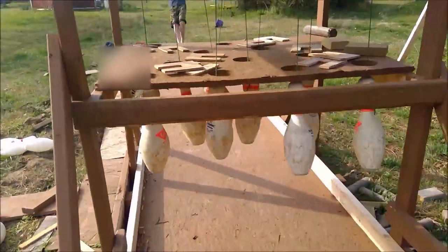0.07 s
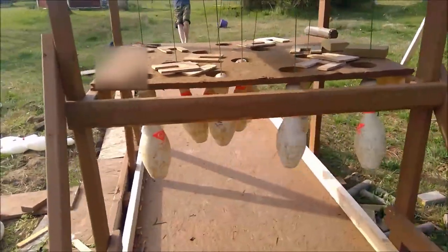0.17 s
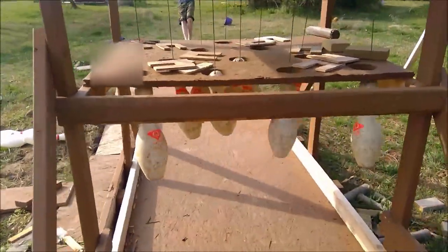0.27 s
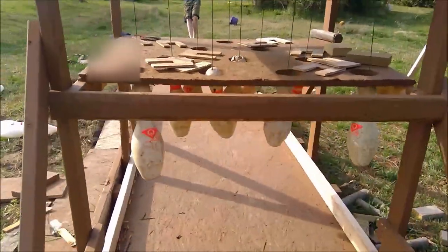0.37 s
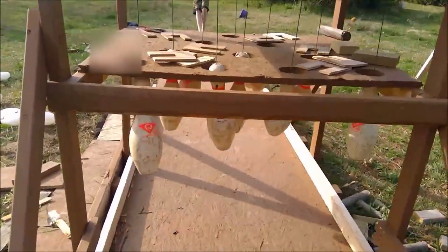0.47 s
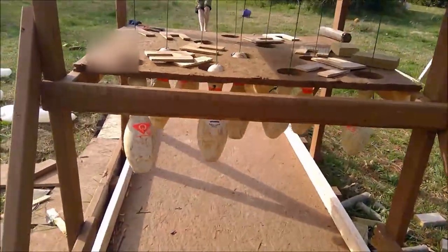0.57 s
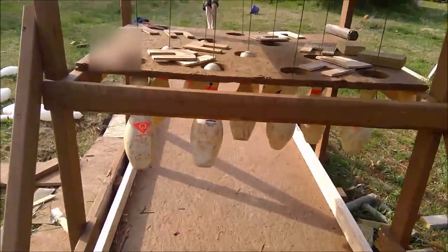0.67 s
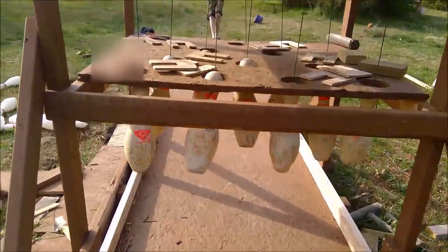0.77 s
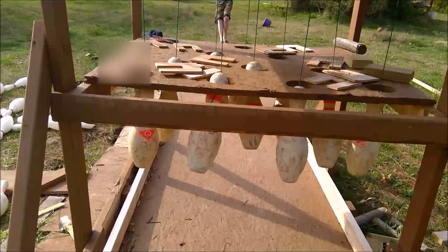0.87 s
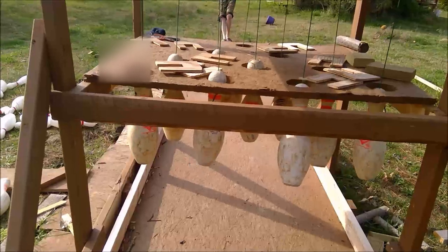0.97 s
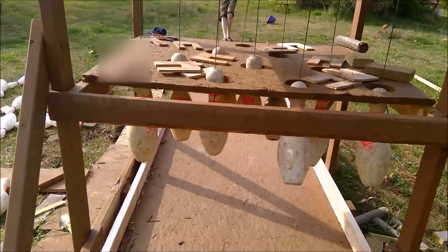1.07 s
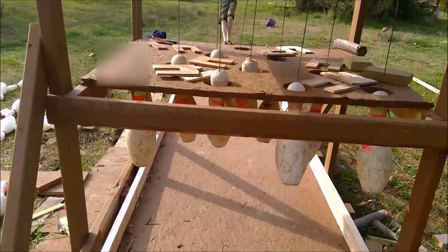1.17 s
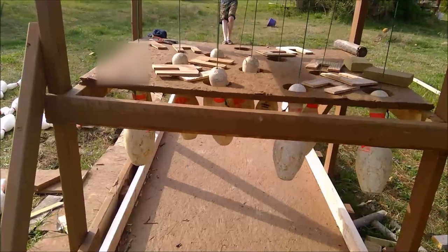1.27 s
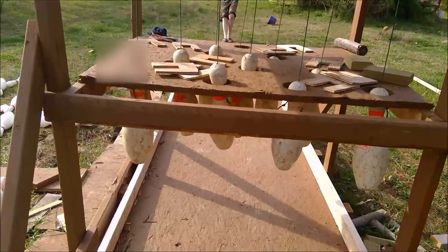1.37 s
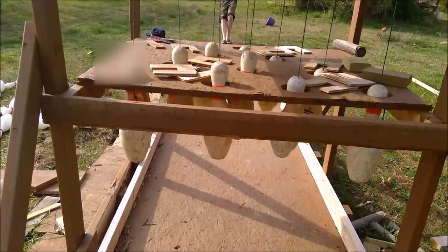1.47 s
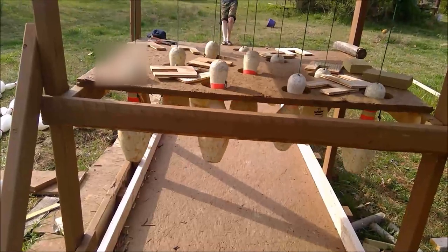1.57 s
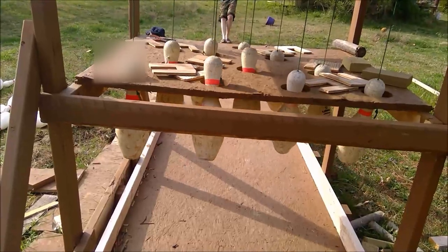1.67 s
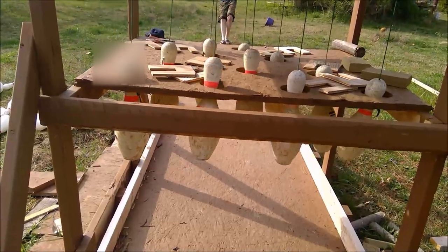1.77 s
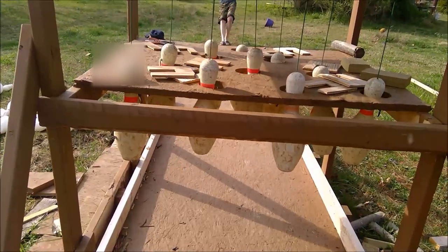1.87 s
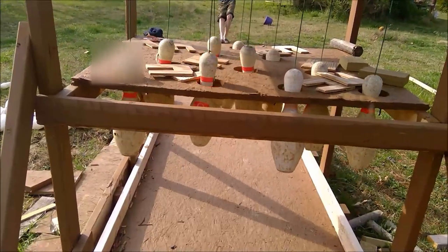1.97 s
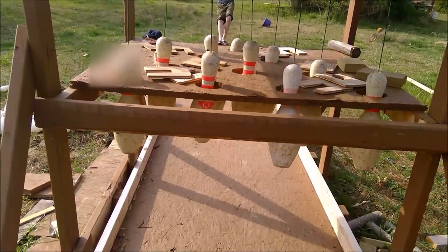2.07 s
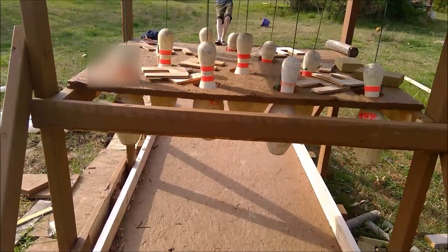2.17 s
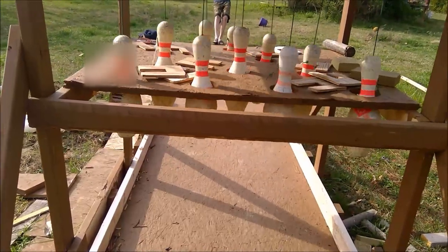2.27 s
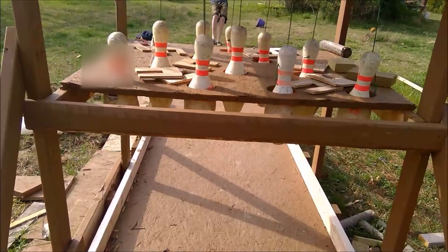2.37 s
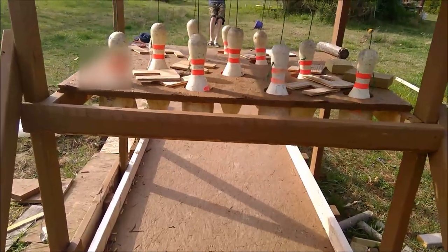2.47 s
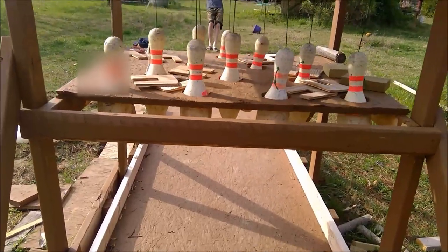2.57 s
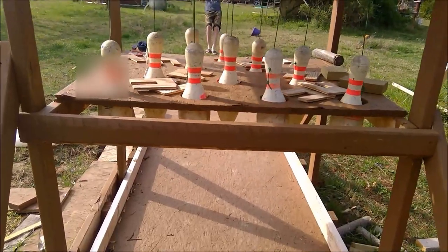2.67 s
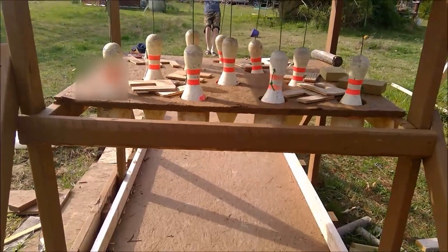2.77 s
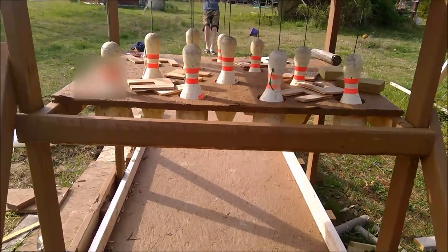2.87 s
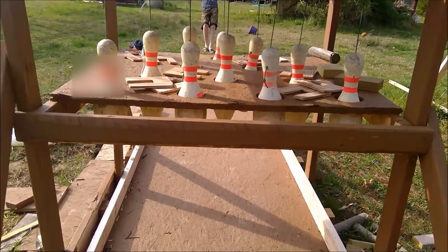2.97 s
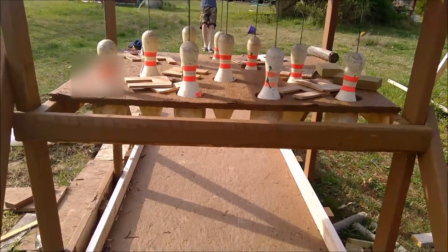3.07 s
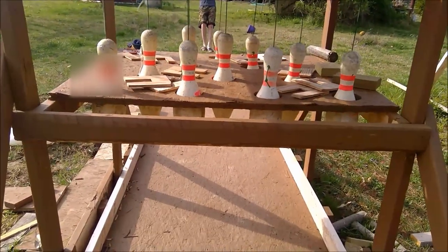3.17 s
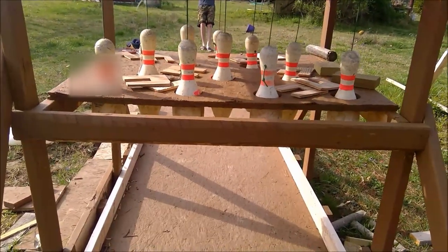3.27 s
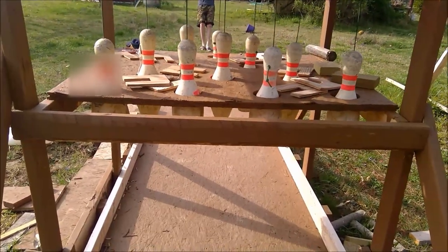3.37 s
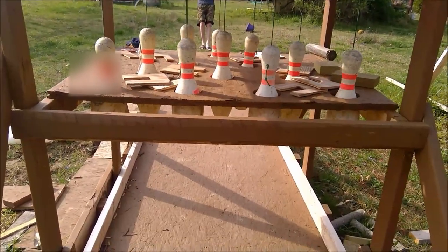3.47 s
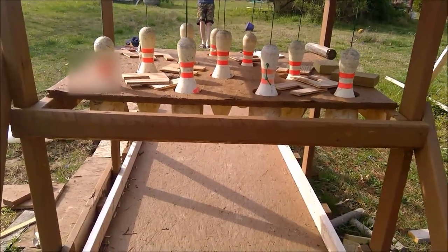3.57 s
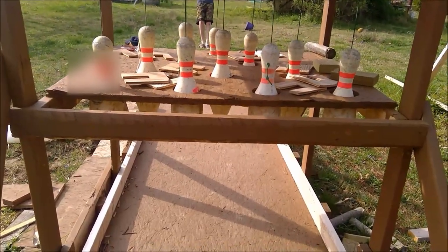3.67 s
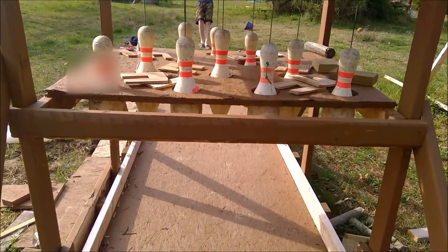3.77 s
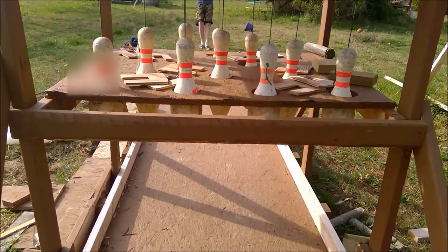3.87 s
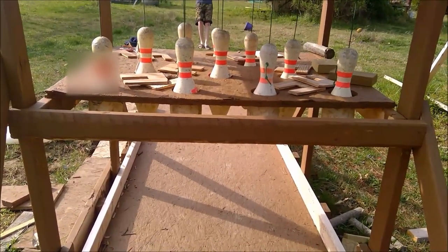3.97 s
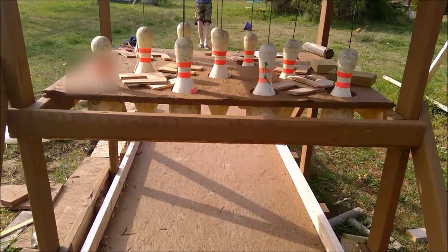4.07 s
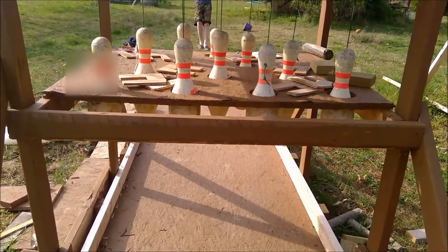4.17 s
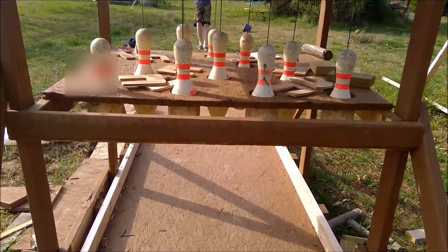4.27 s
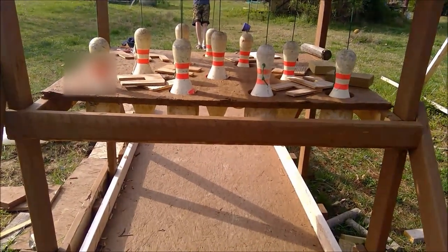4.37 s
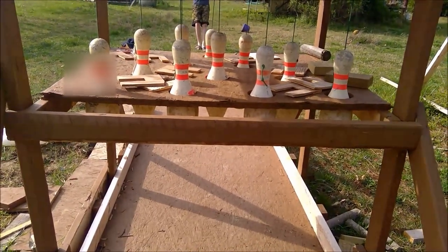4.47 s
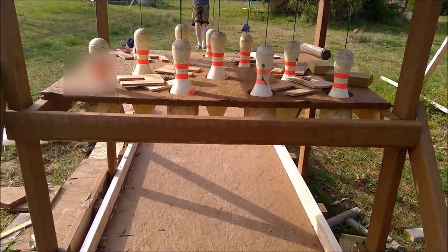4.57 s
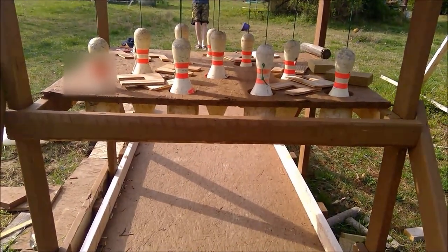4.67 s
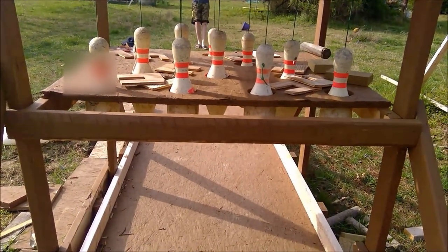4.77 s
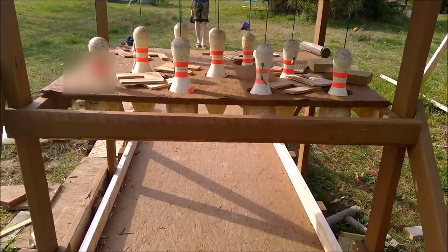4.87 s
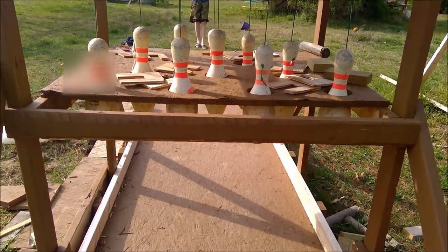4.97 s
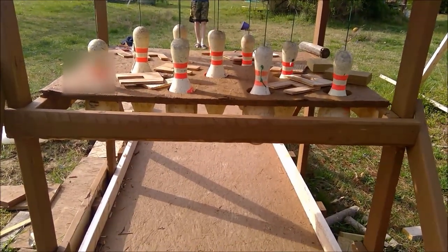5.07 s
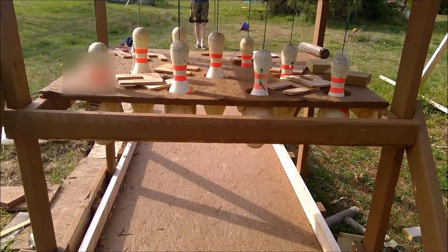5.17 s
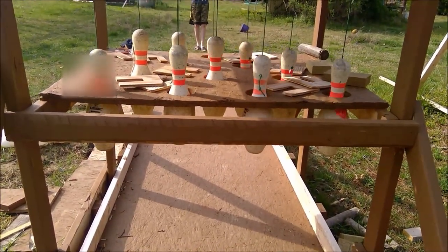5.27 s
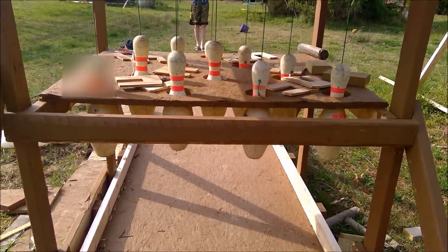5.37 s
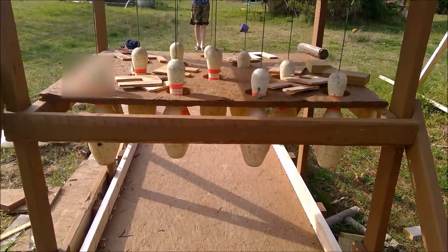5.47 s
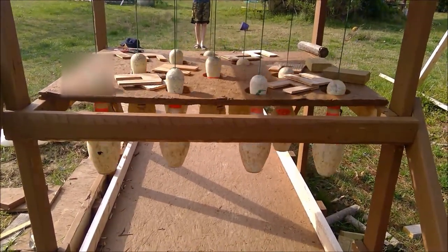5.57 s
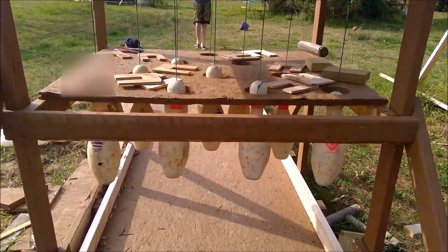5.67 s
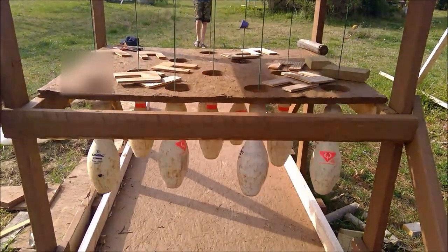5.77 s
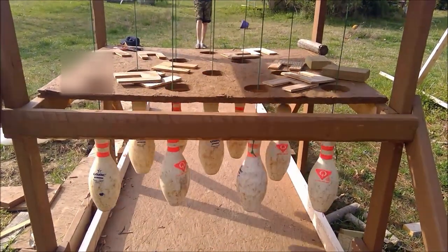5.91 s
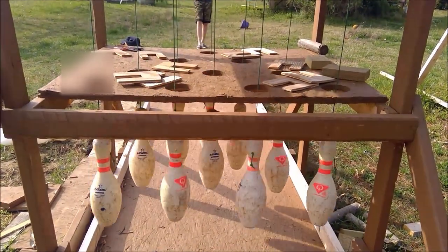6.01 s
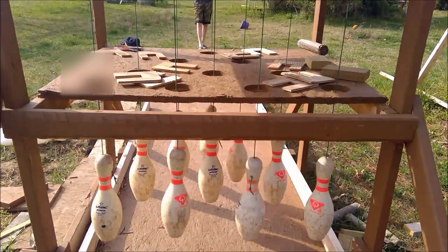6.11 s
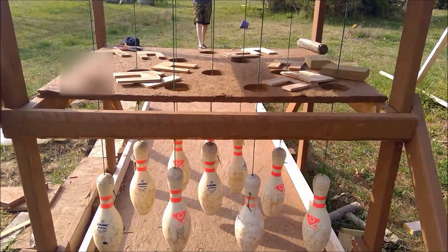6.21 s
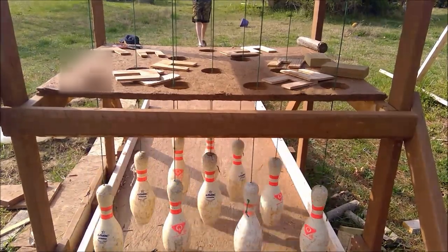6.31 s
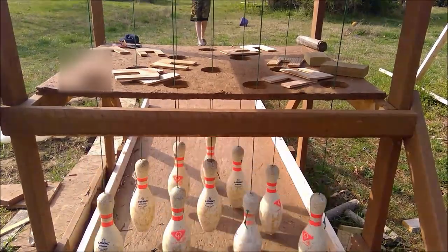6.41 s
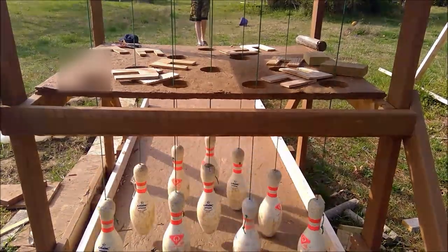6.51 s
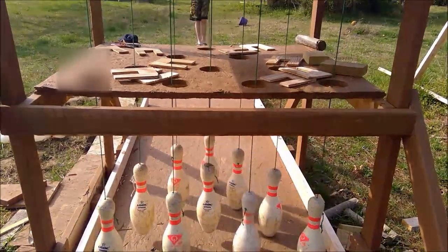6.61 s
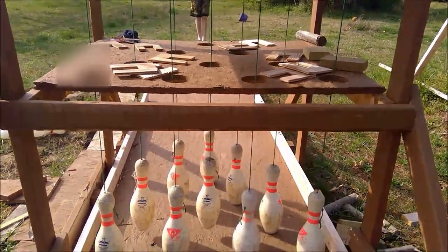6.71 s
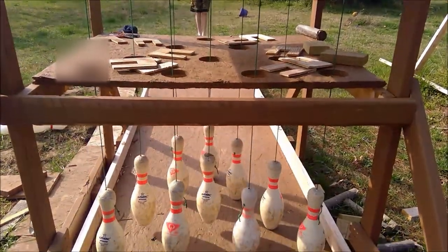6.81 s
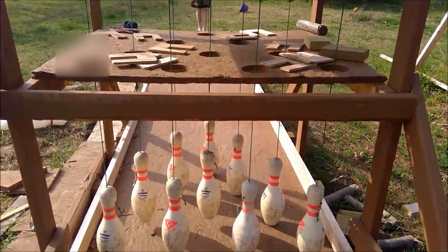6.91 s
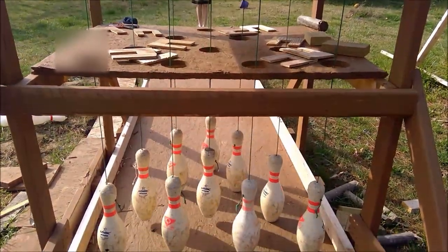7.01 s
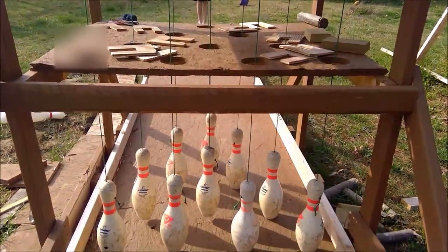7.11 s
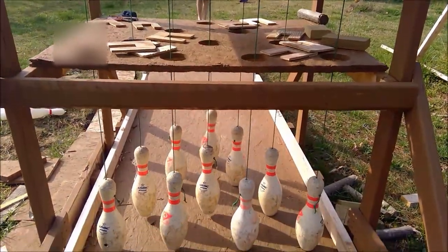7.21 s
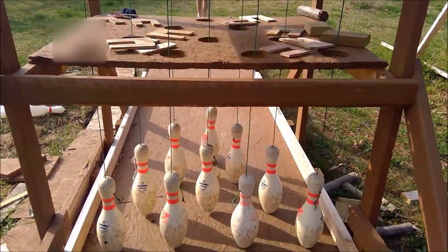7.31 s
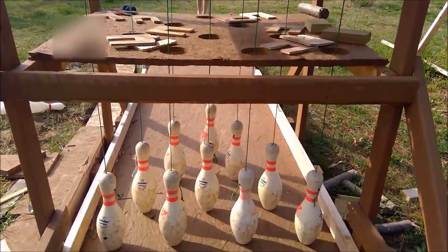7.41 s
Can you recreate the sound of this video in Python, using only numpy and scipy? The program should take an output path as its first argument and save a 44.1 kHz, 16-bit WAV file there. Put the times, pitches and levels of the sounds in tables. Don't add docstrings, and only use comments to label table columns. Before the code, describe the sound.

Outdoors, dangling wooden pins knock and rattle against a hollow deck, fall nearly silent amid wind and birdsong, then whirr down and thump onto boards.

```python
import sys
import numpy as np
from scipy import signal
from scipy.fft import rfft, irfft, next_fast_len
from scipy.io import wavfile
from scipy.ndimage import uniform_filter1d

SR = 44100
rng = np.random.default_rng(int(sys.argv[2]) if len(sys.argv) > 2 else 0)


def voltage_ratio(level):
    return 10 ** (np.asarray(level, float) / 20)


def waveform_to_disk(signal):
    frames = np.transpose(np.atleast_2d(signal))
    scaled = np.clip(frames, -1, 1) * 32767
    samples = np.round(scaled).astype(np.int16)
    wavfile.write(sys.argv[1], SR, samples)


N = 328545


def evened(x):
    return x / np.sqrt(np.mean(x ** 2) + 1e-20)


def smooth_noise(shape, first, second, axis=-1):
    return uniform_filter1d(uniform_filter1d(rng.standard_normal(shape), first, axis=axis), second, axis=axis)


def read(points, hz):
    f, value = np.transpose(points)
    return np.interp(np.log(hz + 1), np.log(f + 1), value)


def follow(rows, t, share=0.9711, over_db=0.):
    s, db = np.transpose(rows)[[0, -1]]
    return voltage_ratio(np.interp(t, s, share * db + over_db, -150, -150))


def add(mix, s, sound):
    part = mix[..., max(round(s * SR), 0):][..., :sound.shape[-1]]
    part += sound[..., :part.shape[-1]]


def colour(x, points):
    size = next_fast_len(N, True)
    gain = voltage_ratio(read(points, np.fft.rfftfreq(size, 1 / SR)))
    return evened(irfft(rfft(x, size) * gain, size)[:N])


def patchy(x):
    strands_db, strand_hz, strand_s = 3, 350, .12
    z = signal.stft(x, nperseg=512)[2]
    bins, frames = int(strand_hz * 512 / SR) + 1, int(strand_s * SR / 256) + 1
    rows = uniform_filter1d(rng.standard_normal(z.shape), bins, axis=0)
    patches = uniform_filter1d(rows, frames, axis=1)
    return evened(signal.istft(z * voltage_ratio(strands_db * evened(patches)), nperseg=512)[1][:N])


def strike(modes, rattle_s, spread, contact_s, rise_s):
    t = np.arange(5000) / SR
    hz, db, t60 = np.transpose(modes)[:, :, None, None]
    detune = 1 + spread * rng.uniform(-1, 1, (len(modes), 2, 1))
    db = db + 1.5 * rng.standard_normal(detune.shape)
    fall = voltage_ratio(db) * np.exp(-np.log(1000) * t / t60)
    ring = (fall * np.sin(2 * np.pi * hz * detune * t)).sum((0, 1))
    chatter = rng.standard_normal(1500) * voltage_ratio(4 * rng.exponential(1, 1500))
    push = np.convolve(chatter * np.exp(-t[:1500] / rattle_s), np.hanning(int(contact_s * SR) + 3))
    sound = signal.oaconvolve(ring, push)[:len(t)]
    sound = sound * (1 - np.exp(-t / rise_s)) * np.cos(np.pi / 2 * t / t[-1])
    return sound / abs(sound).max()


def tone(rows, waver, overtone_db, blur_hz=0.):
    out, t = np.zeros(N), np.arange(rows[0][0] - .01, rows[-1][0] + .01, 1 / SR)
    tremble, flutter = (evened(x) for x in smooth_noise((2, len(t)), 300, 300))
    pitch_hz = np.interp(t, *np.transpose(rows)[:2]) + blur_hz * tremble
    turn = 2 * np.pi * np.cumsum(pitch_hz) / SR
    level = uniform_filter1d(follow(rows, t), 200) * (1 + waver * flutter)
    overtones = np.sin(2 * turn) + np.sin(3 * turn) / 2
    add(out, t[0], np.sqrt(2) * level * (np.sin(turn) + voltage_ratio(overtone_db) * overtones))
    return out


def note(start, length, first_hz, last_hz, db, sag_db, haste=0.76):
    attack_s, release_s, edge_fall_db = haste * .02, haste * .04, -22.
    end = start + length
    return [(start - attack_s, first_hz, db + edge_fall_db),
            (start + attack_s, .4 * first_hz + .6 * last_hz, db),
            (end, last_hz, db + sag_db),
            (end + release_s, last_hz, db + sag_db + edge_fall_db)]


# t/s, level/dB, left-right/dB
GUSTS = [(0.0, -31, -14.5), (0.52, -36.5, 7.5), (1.2, -35, -7), (1.68, -36.5, -1), (2.18, -31, -10.5),
         (2.59, -36, 1.5), (3.09, -38.5, -10.5), (4.11, -37, 47), (4.94, -51.5, 24), (5.48, -35.5, 1),
         (5.66, -37, 44), (6.02, -47.5, -14), (6.16, -43, 22), (6.39, -27.5, -3.5), (6.6, -40, 13.5),
         (6.89, -31, -11.5), (7.45, -40, 9.5)]
# f/Hz, density/dB
BUFFET = [(15, -2), (50, 4.5), (110, -1), (200, -27), (400, -69.5), (900, -140)]
# f/Hz, density/dB
FLUTTER = [(60, -30), (130, 1), (210, -2), (380, -26), (700, -44), (1200, -76), (2500, -140)]
# t/s, level/dB
POPS = [(3.245, -26), (3.368, -26.5), (3.467, -27.5), (3.627, -36), (3.825, -24.5), (3.883, -22.5),
        (4.026, -20), (4.098, -18.5), (4.148, -22.5), (4.226, -23), (4.319, -28.5), (4.652, -22)]
# f/Hz, density/dB
AIR = [(410, -30), (700, 0), (1230, -10), (1750, -11), (6230, -17), (12000, -20), (16000, -26)]


def wind():
    t = np.arange(N) / SR
    swell = smooth_noise((2, N), 900, 900)
    lumps = rng.standard_normal((2, N)) * voltage_ratio(4.4 * evened(swell))
    strength = [row[:2] for row in GUSTS]
    low_gain = voltage_ratio(2.0) * follow(strength, t)
    flutter_gain = follow(strength, t, 1.5558, 11.5)
    left, right = (low_gain * colour(x, BUFFET) + flutter_gain * colour(x, FLUTTER) for x in lumps)
    tilt = voltage_ratio(np.interp(t, *np.transpose(GUSTS)[[0, 2]]))
    buffet = np.array([tilt * left, 0.055 * left + 0.64 * right]) * 2 / np.hypot(1, tilt)
    for s, db in POPS:
        pop = strike([(58.73, 9.0, 0.0705), (147, 8.43, 0.0262)], 0.0143, spread=0.072,
                     contact_s=0.00326, rise_s=0.0025)
        add(buffet[0], s, voltage_ratio(db + 8.0) * pop)
    air = np.array([colour(x, AIR) for x in rng.standard_normal((2, N))])
    return buffet + voltage_ratio(-86 + np.array([[5.], [8.5]])) * air


# t/s, level/dB
SCRAPES = [
    [(0., -34), (.2, -39), (.36, -44.5), (.45, -58)],
    [(.44, -58.5), (.52, -37.5), (.61, -37), (.655, -48.5), (.95, -32.5), (1.15, -54.5), (1.35, -28.5),
     (1.54, -46), (1.72, -63.5)],
    [(1.66, -60), (1.8, -51.5), (1.87, -41), (1.94, -47), (2.04, -40), (2.21, -26.5), (2.5, -58.5),
     (2.8, -78.5)],
    [(5.26, -65), (5.32, -46.5), (5.37, -42.5), (5.41, -49.5), (5.468, -34), (5.56, -42.5), (5.66, -71)],
]
RUSTLE_DB = [-31, -29.5, -29.5, -23]
# f/Hz, density/dB
RUMBLE = [(35, -35.5), (60, 2), (335, -14.5), (464, -12.5), (950, -24), (2550, -43), (3200, -48),
          (4200, -95)]
# f/Hz, density/dB
RUSTLE = [(880, -28.5), (1500, -4.5), (2540, -7), (2910, -13.5), (3380, -6), (7760, -16), (16000, -26)]
# t/s, level/dB
WHIRR = [(4.7, -27), (5.09, -26), (5.16, -14), (5.436, 1), (5.89, -10.5), (6.26, -12), (6.36, -27)]
# f/Hz, density/dB
FIZZ = [(1530, -51), (2600, -15), (5040, -6), (6880, -18.5), (8450, -2.5), (10500, -14.5), (12000, -1),
        (15500, -7)]


def scrapes():
    t = np.arange(N) / SR
    grains = 2.5 * rng.exponential(1, (2, N // 120 + 1)).clip(max=3).repeat(120, 1)[:, :N]
    clumps = 3.5 * evened(smooth_noise((2, N), 700, 400))
    low, high = rng.standard_normal((2, N)) * voltage_ratio(grains + clumps * [[1], [1.4]])
    rub = sum(follow(rows, t) for rows in SCRAPES) + follow(WHIRR, t, 0.76, -56.5)
    fibre = sum(follow(rows, t, .7, db) for rows, db in zip(SCRAPES, RUSTLE_DB))
    cord_hiss = patchy(colour(rng.standard_normal(N) * voltage_ratio(0.7 * clumps[1]), FIZZ))
    rumble = rub * colour(low, RUMBLE)
    rustle = fibre * colour(high, RUSTLE)
    fizz = follow(WHIRR, t, over_db=-67) * cord_hiss
    return voltage_ratio(7.0) * rumble + voltage_ratio(4.0) * rustle + voltage_ratio(8.5) * fizz


# t/s, level/dB, centre f/Hz, treble over crack/dB
TICKS = [(0.0363, -22, 2600, -21.5), (0.273, -41.5, 3760, -16), (0.304, -37, 2553, -19),
         (0.3654, -32, 4440, -9), (0.675, -33, 3880, -17), (0.6996, -33.5, 3200, -15.5),
         (0.738, -35.5, 4380, -16.5), (0.7842, -24, 2800, -22), (0.894, -34, 3660, -25.5),
         (1.1844, -35, 4490, -26.5), (1.451, -33.5, 3700, -11), (1.484, -38, 4130, -8),
         (1.502, -34, 4200, -13), (1.5323, -31.5, 3177, -10.5), (1.749, -19, 4260, -6),
         (1.897, -35, 3580, -20), (2.044, -36.5, 5450, -3.5), (2.0538, -16, 3925, -19),
         (2.0785, -15.5, 3930, -18), (2.1063, -21, 2560, -13.5), (2.1188, -16, 3804, -17.5),
         (2.166, -25, 2590, -17.5), (2.209, -20, 2670, -10), (2.2303, -17, 3620, -22),
         (2.272, -21, 3770, -17), (2.351, -36, 2700, -17), (2.392, -38, 5300, -6.5),
         (2.5376, -38.5, 4720, -5.5)]
# t/s, level/dB, centre f/Hz, wooden body over crack/dB
FAR_TICKS = [(2.74, -56, 4604, -19.5), (2.7917, -45, 5600, -13), (2.953, -44, 5260, -16),
             (3.206, -34, 4430, -20), (3.216, -29.5, 9165, -11.5), (3.3717, -35, 5472, -10),
             (4.7145, -43.5, 6000, -14), (4.7486, -27.5, 4256, -4), (4.8861, -32, 5588, -26),
             (5.1128, -38, 4683, -10), (5.15, -29, 4345, 0), (5.31, -39, 6715, -20.5),
             (5.352, -33, 6431, -21), (5.375, -34.5, 3582, -16), (5.419, -20.5, 2652, 3),
             (5.426, -18, 3821, -3), (5.465, -25, 3860, 1), (5.5087, -23, 4196, -3.5),
             (5.5686, -25.5, 2788, -3.5), (5.6979, -50.5, 4950, -4.5), (5.8886, -38, 10700, -15),
             (6.0407, -36.5, 7200, -22), (6.2845, -49, 2625, -2), (7.434, -36.5, 6790, -19.5),
             (7.4434, -34.5, 2499, -14)]
# t/s, level/dB
SNAPS = [(3.4933, -50.5), (3.5036, -33), (3.5637, -28.5), (4.5077, -38), (4.5471, -37), (4.6012, -32),
         (4.6648, -29.5)]


def ticks():
    t, hz = np.arange(3072) / SR, np.fft.rfftfreq(3072, 1 / SR) + 1
    out = np.zeros(N)
    lead_s, rise_s = .02, 0.00074
    after = np.maximum(t - lead_s, 0)
    spray_peaks = ((7800, .6), (9000, 0.915), (12400, 0.51), (14800, 0.14))  # f/Hz, share
    spray = sum(share / (1 + ((hz - f) / 900) ** 2) for f, share in spray_peaks)
    spray = spray / (1 + (7000 / hz) ** 8)
    woody = 1 / (1 + (hz / 2200) ** 4) / (1 + (750 / hz) ** 4)
    cracks = [(s + .002, db - 21.5 + 0.2045 * (db + 8), 2700, -17) for s, db, *_ in KNOCKS + RIM_KNOCKS]
    rows = [(*row, -5.) for row in TICKS + cracks]
    rows += [(s, db, f, -15, body_db) for s, db, f, body_db in FAR_TICKS]
    rows += [(s, db, 6000, -21, -32.5) for s, db in SNAPS]
    for s, db, centre_hz, spray_db, body_db in rows:
        peak = 1 / (1 + ((hz - centre_hz) / (0.12 * centre_hz)) ** 2)
        crack = (peak + 0.55 / (1 + (hz / 6500) ** 6)) / (1 + (0.619 * centre_hz / hz) ** 14)
        for band, over_db, t60 in ((crack, 2.5, .027), (spray, spray_db + 8.5, .015), (woody, body_db, .045)):
            grit = rng.standard_normal(len(t)) * voltage_ratio(3.15 * rng.exponential(1, len(t)))
            noise = irfft(rfft(grit) * band)
            spike, tail = 1.7 * voltage_ratio(-60 * after / .007), .04 * voltage_ratio(-60 * after / .09)
            fall = (spike + voltage_ratio(-60 * after / t60) + tail) * np.minimum(after / rise_s, 1)
            scuff = 0.052 * np.exp(-abs(t - lead_s) / 0.0054)
            burst = noise * (fall + scuff)
            add(out, s - .0003 - lead_s, voltage_ratio(db + over_db) * burst / abs(burst).max())
        chip = np.sin(2 * np.pi * centre_hz * t) * np.minimum(t / rise_s, 1)
        add(out, s, voltage_ratio(db - 11 - 60 * t / .012) * chip)
    return out


# t/s, level/dB, loudest ring f/Hz, boom over ring/dB, boom f/Hz
KNOCKS = [(0.037, -6, 493, -16.5, 206.2), (0.112, -12.5, 560, -4.5, 243.5), (0.147, -1, 480, -20, 249.4),
          (0.199, -23, 458, -0.5, 205), (0.24, -30.5, 519, 1, 200), (0.286, -28, 466, -2.5, 195),
          (0.443, -35, 401, 3.5, 174), (0.481, -20.5, 533, -3.5, 211), (0.523, -21.5, 468, -9.5, 190.5),
          (0.563, -27.5, 592, -3.5, 205), (0.7, -32.5, 533, -7.5, 186), (0.752, -9.5, 683, -9, 201.7),
          (0.788, -17.5, 778, -6, 151.5), (0.837, -13.5, 650, -6, 197.2), (0.871, -15, 440, -11, 144),
          (0.903, -24.5, 573, -1.5, 170), (0.932, -13.5, 423, -14, 191), (0.944, -8, 497, -11, 209),
          (1.0, -8, 517, -8.5, 217.1), (1.03, -14.5, 635, -6.5, 252), (1.07, -21, 464, -5, 229),
          (1.089, -21.5, 458, -4, 205), (1.186, -15, 560, -4.5, 202.6), (1.219, -11.5, 576, -5.5, 268.6),
          (1.274, -4, 462, -13.5, 318), (1.288, -5, 450, -9, 219), (1.333, -8.5, 557, -16.5, 139),
          (1.364, -14, 428, -11.5, 202), (1.414, -15.5, 565, -3, 192), (1.478, -26.5, 414, 2.5, 201.3)]
# t/s, level/dB, loudest ring f/Hz, boom over ring/dB, boom f/Hz
RIM_KNOCKS = [(1.752, -8.5, 539.7, -10, 205), (1.829, -17.5, 437.6, -0.5, 198), (1.899, -32.5, 456, 6, 143),
              (1.963, -8, 474, -17, 209.8), (2.026, -27.5, 504, 1.5, 173.3), (2.056, -22.5, 510, 3, 143),
              (2.075, -9.5, 731.5, -5.5, 198), (2.104, -16.5, 464, -1, 172.2),
              (2.131, -10, 494, -7.5, 220.7), (2.151, -14, 505.5, -4.5, 143),
              (2.164, -18.5, 458, -1.5, 218), (2.209, -19, 516, -3, 250), (2.243, -11.5, 493.6, -4.5, 188),
              (2.274, -18, 472, 1, 206), (2.309, -29.5, 552, 7, 142.8), (2.359, -30.5, 458, 6, 205),
              (2.432, -36, 517, -1, 143), (2.54, -39, 466.2, 5, 150), (2.577, -39.5, 480, 5, 147),
              (2.68, -58, 405.8, 14.5, 161), (2.884, -52, 641, 14, 156.1), (3.088, -56.5, 412, 13.5, 183.3),
              (3.373, -43.5, 576, 7, 144.1), (5.295, -36.5, 455, -3, 155.3), (5.339, -33.5, 480, -2, 191.3),
              (5.365, -30.5, 458, 2.5, 279.6), (5.418, -24.5, 456, -7.5, 144),
              (5.465, -8.5, 551, -14, 280.4), (5.515, -28.5, 455, -7, 151), (5.561, -31, 1186, -5, 171)]
# t/s, level/dB, f/Hz
NECK_RINGS = [(0.0386, -13, 1020), (0.1131, -21.5, 1400), (0.1462, -6.5, 1108), (0.4809, -33, 1020),
              (0.5222, -28, 1182), (0.7515, -22, 1210), (0.7876, -22, 1030), (0.8359, -24.5, 1340),
              (0.9345, -17.5, 912), (0.9457, -12, 964), (1.0047, -18, 1070), (1.0328, -25.5, 1240),
              (1.078, -28, 929), (1.1824, -27, 972), (1.2196, -22, 1070), (1.2756, -7.5, 977),
              (1.2877, -10, 1043), (1.3328, -15, 985), (1.3635, -21.5, 1060), (1.4131, -25, 1095),
              (1.7509, -26, 1130), (1.8286, -26, 961), (1.9633, -17, 918), (2.0764, -18, 953),
              (2.132, -16, 1180), (2.2421, -22, 939), (5.4605, -20, 1340)]
# f/Hz, level/dB, t60/s
PIN = [(458, -6, 0.09), (576, -3.5, 0.16), (695, 1.5, 0.062), (802.7, -4.5, 0.083), (1003.2, -7.5, 0.05),
       (1182.5, -7.5, .06), (1432.3, -5.5, 0.06), (1720.9, -12.5, 0.041), (2312.4, -17.5, 0.041)]
# f/Hz, level/dB, t60/s
DECK = [(96.2, -10, 0.13), (161, -2, 0.16), (205, -2, 0.12), (258.1, -0.5, 0.22), (318, -8, 0.071)]
# f/Hz, level/dB, t60/s
BELLY = [(1047, 0, 0.14)]


def knocks():
    out = np.zeros(N)
    for s, db, hz, boom_db, boom_hz in KNOCKS + RIM_KNOCKS:
        length = 0.68 + 0.0212 * (db + 5.0)
        contact_s = .0001 * voltage_ratio(-0.6055 * db)
        pin = [(f, d, t60 * length) for f, d, t60 in PIN]
        main_ring = strike([(hz, 0, 0.072)], 0.0016, spread=0.049, contact_s=0.00026, rise_s=0.0017)
        pin_ring = strike(pin, 0.007 * length, spread=0.061, contact_s=contact_s, rise_s=0.0016)
        boom = strike([(boom_hz, 0, 0.11)], .0015, spread=.06, contact_s=0.0013, rise_s=.004)
        deck = strike(DECK, 0.0037, spread=0.13, contact_s=0.0015, rise_s=0.018)
        add(out, s, voltage_ratio(db - 4.5) * main_ring)
        add(out, s, voltage_ratio(db - 0.5) * pin_ring)
        add(out, s, voltage_ratio(db + boom_db) * boom)
        add(out, s, voltage_ratio(db + boom_db - 2) * deck)
    for s, db, hz in NECK_RINGS:
        neck = strike([(hz, 0, 0.044)], .002, spread=.02, contact_s=.0002, rise_s=0.002)
        add(out, s, voltage_ratio(db - 5.5) * neck)
    for s, db, *_ in KNOCKS:
        belly = strike(BELLY, 0.0025, spread=0.008, contact_s=.0002, rise_s=0.00078)
        add(out, s, voltage_ratio(db - 16.5) * belly)
    return out


# t/s, level/dB, boom f/Hz
THUDS = [(2.073, -16, 195.5), (2.141, -14, 66), (2.185, -15, 80), (2.27, -14.5, 85), (2.238, -14.5, 213.7),
         (2.308, -13, 72.75), (6.212, -21.5, 137.6), (6.284, -2, 158.7), (6.339, -3.5, 154),
         (6.399, -13, 133.4), (6.532, -18.5, 51.14), (6.56, -16, 64.3), (6.696, -16, 75),
         (6.868, -32.5, 123.1), (6.963, -11, 135), (6.987, -12, 125), (7.004, -13.5, 150),
         (7.038, -17, 79.5), (7.289, -37.5, 51.34), (7.39, -9.5, 119.1), (7.422, -8.5, 120.7)]
# t/s, level/dB, dull edge over slap/dB
SLAPS = [(6.211, -32, -24), (6.282, -14, -19), (6.297, -17, -18), (6.336, -10.5, -11), (6.398, -27.5, -24),
         (6.561, -37.5, -17.5), (6.695, -36.5, -28.5), (6.86, -34, -34), (6.962, -15.5, -28),
         (6.986, -24, -26), (7.037, -34.5, -19), (7.22, -45, -31), (7.286, -39.5, -41),
         (7.384, -29.5, -19.5), (7.421, -30, -4)]
# f/Hz, level/dB, t60/s
LANE = [(215, 0, 0.11), (260.3, 0, .06), (340, -14, .04), (480, -14, 0.03)]


def thuds():
    out = np.zeros(N)
    for s, db, hz in THUDS:
        modes = [(hz, 0., .14), (1.4 * hz, -9., .1), (.7 * hz, -9., .1)]
        boom = strike(modes, 0.0013, spread=.05, contact_s=0.0026, rise_s=0.0099)
        add(out, s - .003, voltage_ratio(db) * boom)
    for s, db, edge_db in SLAPS:
        slap = strike(LANE, 0.0027, spread=0.053, contact_s=0.00098, rise_s=0.005)
        edge = strike(PIN, 0.012, spread=0.15, contact_s=0.0013, rise_s=0.0017)
        add(out, s, voltage_ratio(db + 0.5) * slap)
        add(out, s, voltage_ratio(db + edge_db - 1.0) * edge)
    return out


# t/s, level/dB, ring f/Hz
CREAKS = [(2.4306, -44, 3760), (2.4977, -61.5, 3312), (2.605, -59, 4170), (2.7367, -49.5, 4287),
          (2.7748, -50.5, 4478), (2.8345, -62, 4950), (2.953, -53.5, 4603), (2.9744, -55.5, 4767),
          (3.0144, -65, 3908), (3.2828, -58, 5110), (3.4295, -58.5, 4960), (3.7808, -67, 4179),
          (3.8242, -78.5, 3357), (3.9453, -72.5, 5394), (4.0694, -76, 3226), (4.151, -67.5, 4673),
          (4.3586, -60, 4500), (4.4324, -75, 4503), (5.2726, -56, 4450), (5.7035, -53, 4900),
          (7.3518, -55, 5248), (7.3824, -55.5, 3520), (7.404, -57, 3650)]
# ratio to ring, level/dB, t60/s
CREAK_MODES = [(1, -1, .07), (0.92, -5, .06), (1.2, -5.5, 0.045), (1.8, -9.5, .04), (0.502, -20, 0.028)]


def creaks():
    out = np.zeros(N)
    for s, db, hz in CREAKS:
        modes = [(ratio * hz, over_db, t60) for ratio, over_db, t60 in CREAK_MODES]
        chirp = strike(modes, .004, spread=0.011, contact_s=.00003, rise_s=.002)
        add(out, s, voltage_ratio(db - 1.5) * chirp)
    return out


# start t/s, length/s, first f/Hz, last f/Hz, level/dB
SQUEAKS = [
    (2.772, 0.028, 1390, 1401, -55),
    (5.886, 0.073, 11300, 9601, -52.5),
    (5.829, 0.036, 2290, 2293, -73.5),
    (6.11, .06, 2190, 2169, -79),
    (6.375, 0.023, 3830, 3757, -61.5),
    (6.559, 0.045, 963, 892.7, -62),
    (7.355, 0.024, 1400, 1376, -60),
]


def squeaks():
    notes = [note(*row, sag_db=-13.5, haste=0.31) for row in SQUEAKS]
    return sum(tone(rows, waver=0.6, overtone_db=-39.0, blur_hz=40.0) for rows in notes)


# start t/s, length/s, first f/Hz, last f/Hz, level/dB
INSECT = [
    (6.422, .3, 11700, 11950, -90),
    (3.6, .9, 11700, 11700, -99),
]


def insect():
    return sum(tone(note(*row, sag_db=-4.5), waver=.2, overtone_db=-86.0) for row in INSECT)


# start t/s, length/s, first f/Hz, last f/Hz, level/dB
BIRD = [
    (4.485, 0.122, 7800, 6350, -66),
    (4.775, 0.1928, 4070, 4006, -57.5),
    (5.01, 0.08, 3980, 3970, -71),
    (5.048, 0.255, 6420, 6303, -67.5),
    (5.305, 0.25, 3585, 3680, -54.5),
    (4.95, 0.138, 3500, 3682, -74),
]


def bird():
    notes = [note(*row, sag_db=-1.5) for row in BIRD]
    whistle = sum(tone(rows, waver=0.335, overtone_db=-63.5, blur_hz=10.) for rows in notes)
    return whistle * voltage_ratio(np.array([[4.], [-9.]]))


# t/s, f/Hz, level/dB, octave level/dB
WHINE = [(5.57, 560, -63.5, -53.5), (5.63, 600.8, -57, -68.5), (5.72, 675, -55.5, -79.5),
         (5.8, 768.9, -54.5, -77.5), (5.91, 815, -52, -76.5), (6.0, 880, -58, -87.5),
         (6.09, 790, -49, -79.5), (6.17, 650, -51.5, -64.5), (6.23, 535, -68, -65.5)]


def whine():
    low = tone([row[:3] for row in WHINE], waver=0.5, overtone_db=-40., blur_hz=12.)
    octave = [(s, 2 * hz, db) for s, hz, _, db in WHINE]
    return low + tone(octave, waver=0.9, overtone_db=-40., blur_hz=25.)


# f/Hz, left-right/dB
SHADE = [(60, -1.5), (180, 2), (550, -5.5), (1650, -9.5), (4970, -19), (15000, -38)]
# f/Hz, left lead/rad
LAG = [(150, -.3), (300, -.95), (690, -1.3), (1500, -1.3), (2240, -2.), (3800, -2.7), (7000, -3.1),
       (15000, -3.5)]


def ports(x):
    size = next_fast_len(N, True)
    hz = np.fft.rfftfreq(size, 1 / SR)
    left = voltage_ratio(read(SHADE, hz)) * np.exp(1j * read(LAG, hz))
    pair = np.array([left, left ** 0]) * 2 / abs(1 + left)
    return irfft(rfft(x, size) * pair, size)[:, :N]


def frame(x):
    t = np.arange(16000) / SR
    fade = voltage_ratio(-60 * t / 0.081) + 0.051 * voltage_ratio(-60 * t / .5)
    hits = rng.random((2, len(t))) < 2000 / SR
    taps = rng.choice([-1., 1.], (2, len(t))) * hits * fade * (t > .003)
    apart = 1.6 * signal.lfilter(*signal.butter(1, 600, "high", fs=SR), taps[1] - taps[0])
    echoes = np.array([taps[0] + apart, taps[0]]) / np.linalg.norm(taps[0])
    return signal.oaconvolve(x, echoes, axes=1)[:, :N]


def scene():
    cords = whine() + squeaks()
    near = ports(scrapes() + ticks() + knocks() + thuds() + creaks() + cords + insect())
    whistles = bird()
    return near + voltage_ratio(-10.0) * frame(near + whistles) + whistles + wind()


def top_cut(x):
    return signal.sosfilt(signal.butter(12, 15900, fs=SR, output="sos"), x)


def record(dry):
    mix = np.clip(dry, -.99, .99)
    return top_cut(mix)


dry = scene()
out = record(dry)
waveform_to_disk(out)
```